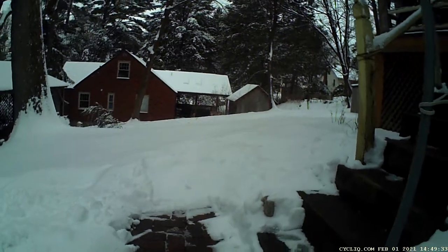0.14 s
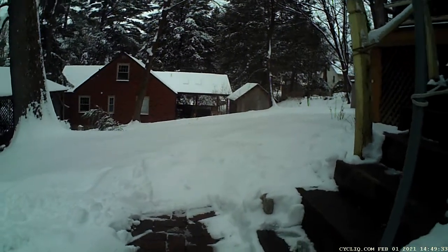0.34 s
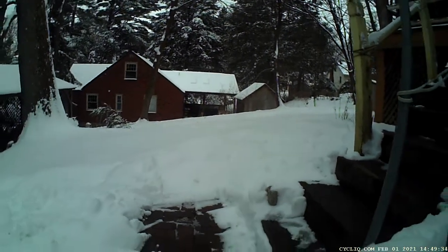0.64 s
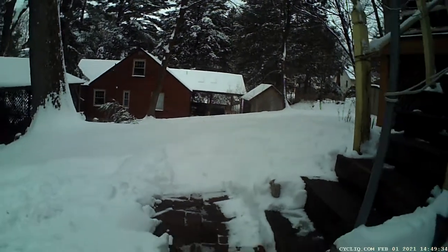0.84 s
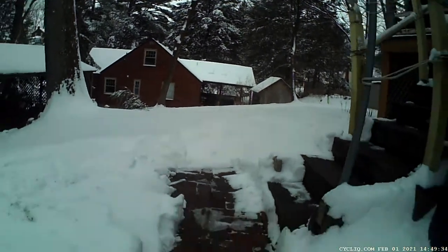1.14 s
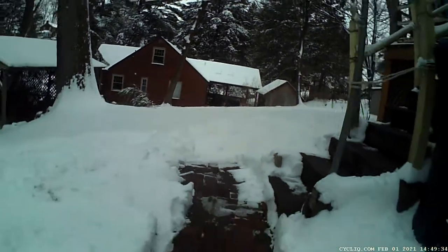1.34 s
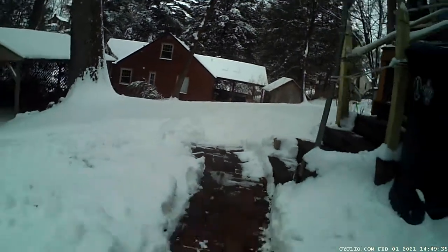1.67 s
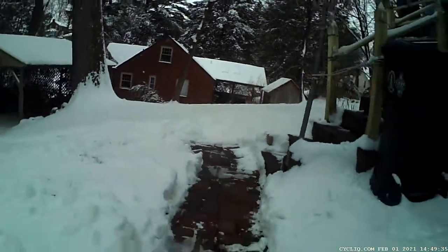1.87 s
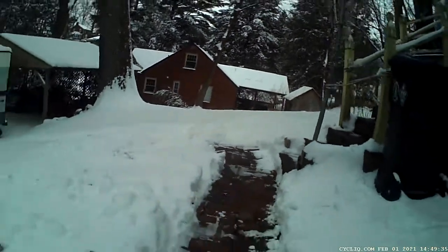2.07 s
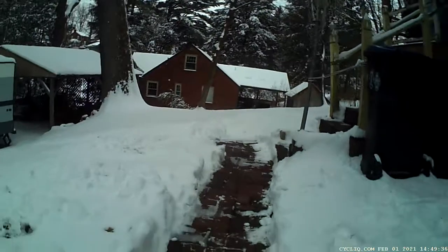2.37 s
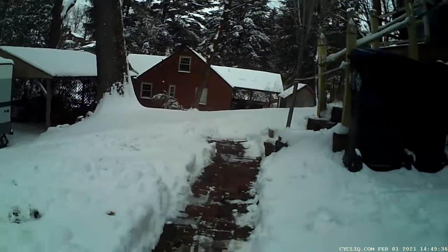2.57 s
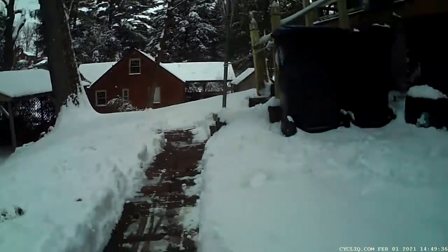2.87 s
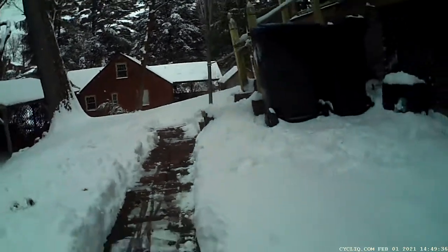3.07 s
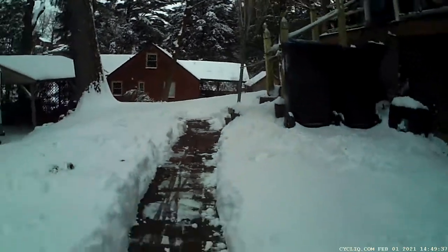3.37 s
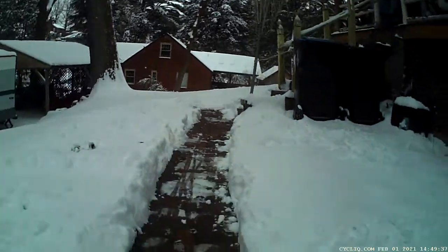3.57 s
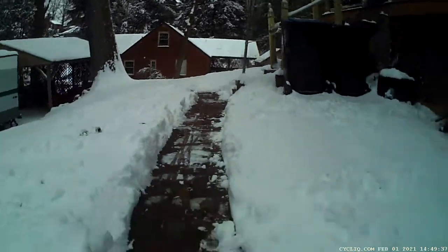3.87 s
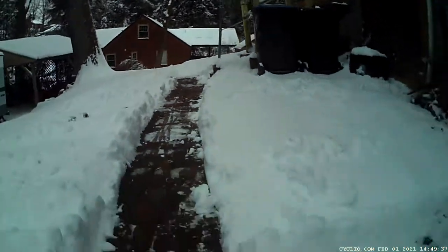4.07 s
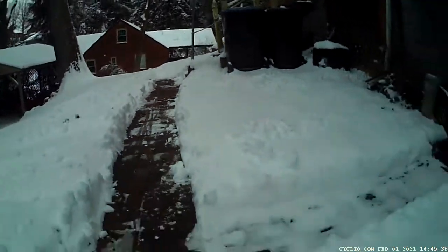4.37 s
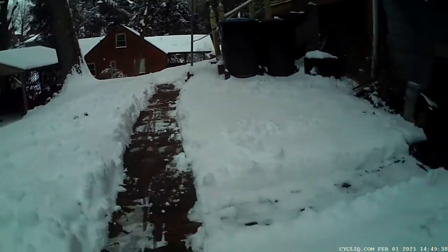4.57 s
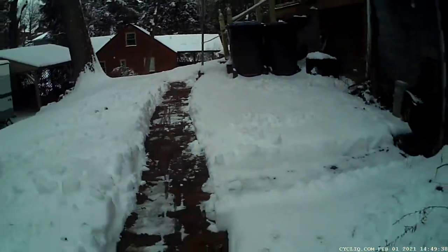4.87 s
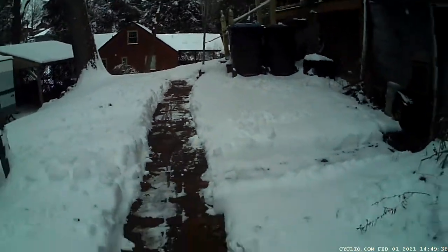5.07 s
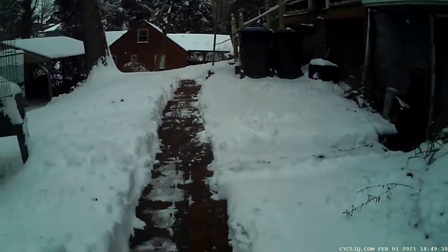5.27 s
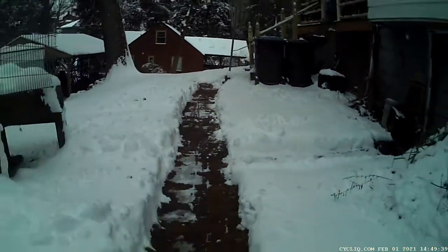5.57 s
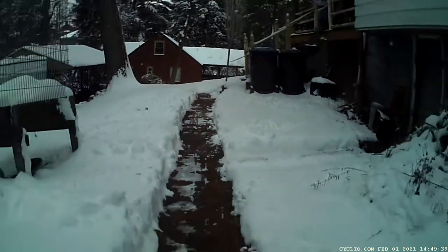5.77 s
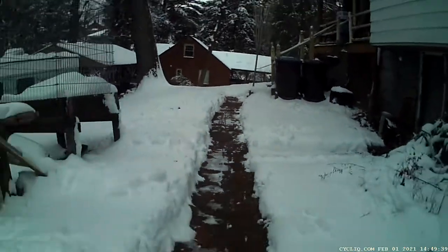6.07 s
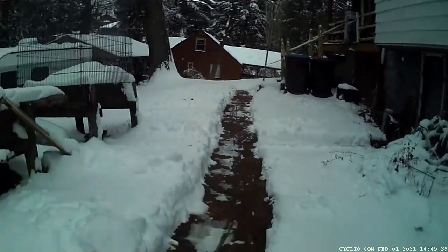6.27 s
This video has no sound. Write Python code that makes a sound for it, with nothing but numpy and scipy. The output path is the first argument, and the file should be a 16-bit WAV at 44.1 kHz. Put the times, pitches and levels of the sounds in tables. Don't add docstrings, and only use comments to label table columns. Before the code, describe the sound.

A bicycle is wheeled over an uneven brick path through snow, heard by a sealed camera microphone clamped to it, so everything is close, dry and muffled, without echo. For the first 0.9 seconds there is mostly soft steady hiss and a faint tremble, with small freewheel ticks at about 0.45 and 0.95. Just after 1 second the first jolts arrive, low thuds with a brief rattle, followed by lighter bumps until a firmer cluster around 2.0 to 2.4. Sharp taps near 2.9 lead to a heavy lurch and loud plastic clatter at 3.1 to 3.25. Irregular knocks, hollow thuds and cable slaps continue from 3.4 to 4.4. After a thinner stretch, the hardest clatter bursts at 4.9 to 5.0. Then come ticks, isolated slaps and low rumble, another rattle at 5.9, and a last bump at 6.3.

```python
import sys
import numpy as np
from scipy import signal
from scipy.fft import rfft, irfft, next_fast_len
from scipy.io import wavfile

SR = 44100
rng = np.random.default_rng(int(sys.argv[2]) if len(sys.argv) > 2 else 0)


def to_linear_factor(level_db):
    exponent = np.asarray(level_db, float) / 20
    return 10 ** exponent


def transcribe(u):
    v = np.clip(np.atleast_2d(u).T, -1, 1)
    q = np.round(v * 32767).astype(np.int16)
    wavfile.write(sys.argv[1], SR, q)


N = 282884


def unit(x):
    return x / np.sqrt(np.mean(x ** 2) + 1e-20)


def filtered(x, response):
    m = next_fast_len(N + SR // 2)
    return irfft(rfft(x, m) * response(np.fft.rfftfreq(m, 1 / SR)), m)[..., :N]


def rung(x, modes, soft_hz):
    def body(f):
        h = 0
        for k, (mode_hz, width_hz, level_db) in enumerate(modes):
            damping = 1j * f * width_hz
            h = h + (-1) ** k * to_linear_factor(level_db) * damping / (mode_hz ** 2 - f * f + damping)
        h = h / (1 + 1j * f / soft_hz) ** 2
        return h / np.sqrt(np.mean(np.abs(h) ** 2))
    return filtered(x, body)


def impulses(seconds, sizes):
    at = np.clip(np.round(np.ravel(seconds) * SR).astype(int), 0, N - 1)
    return np.bincount(at, np.ravel(sizes), N)


def grit(per_second):
    return unit((rng.random(N) < per_second / SR) * rng.standard_normal(N))


def bursts(events, cycles_up, cycles_down, sign):
    out = np.zeros(N + SR)
    for (start_s, peak_db, pitch_hz), way in zip(events, sign):
        turn = np.arange(-3 * cycles_up, 6 * cycles_down, pitch_hz / SR)
        rise, fall = np.exp(-(turn / cycles_up) ** 2), np.exp(-turn / cycles_down)
        shape = np.where(turn < 0, rise, fall)
        first = round((start_s + turn[0] / pitch_hz) * SR)
        out[first:first + len(turn)] += way * to_linear_factor(peak_db) * shape * np.cos(2 * np.pi * turn)
    return out[:N]


def random_signs(events):
    return np.sign(rng.standard_normal(len(events)))


# pitch_hz, density_db_per_hz
HISS = [(20, 9), (60, 14.5), (150, 17), (400, 13), (900, 11.5), (1500, 5.5), (3000, 3), (6000, 0),
        (14000, -1.5), (15500, -3), (17000, -23)]


def microphone_hiss():
    pitch_hz, density_db = np.transpose(HISS)
    colour = lambda f: to_linear_factor(np.interp(np.log(f + 1), np.log(pitch_hz), density_db))
    return to_linear_factor(-64) * unit(filtered(rng.standard_normal(N), colour))


# start_s, roughness_db
ROUGHNESS = [(0, -80), (.62, -77.5), (.95, -65.5), (1.5, -60), (1.8, -68.5), (2.15, -54), (2.5, -61.5),
             (2.95, -64.5), (3.25, -56.5), (3.65, -58), (4.25, -59.5), (4.7, -65), (4.97, -57.5),
             (5.2, -66.5), (5.5, -64), (5.9, -55), (6.15, -64), (6.41, -54.5)]
# pitch_hz, width_hz, level_db
FORK_MODES = [(26.1, 6.6, 1.5), (41.6, 12.6, -0.5), (57.5, 25, -9)]
FRAME_MODES = [(62.1, 13.2, 2), (99.2, 8.3, -1), (125, 17, -2.5), (177.7, 37, -8), (197.6, 47, -11),
               (320, 260, -21)]
MOUNT_MODES = [(397, 94, -4), (613, 75, 1.5), (912, 108, 0.5), (1250, 117, -1), (1420, 130, -0.5),
               (1800, 750, -7)]
SHELL_MODES = [(2120, 270, 0), (2650, 270, 1), (3180, 430, -0.5), (3760, 175, -1), (4120, 260, -5),
               (5000, 2700, -16)]
SWAY_DB, SWAY_GROWTH = -44.5, 1.2
RUMBLE_DB, RUMBLE_GROWTH = -58.5, 0.99
CHATTER_DB, CHATTER_GROWTH = -74, 0.45


def rolling():
    start_s, roughness_db = np.transpose(ROUGHNESS)
    rough_db = np.interp(np.arange(N) / SR, start_s, roughness_db)
    rough_db = rough_db - rough_db.mean()
    sway_db = np.minimum(SWAY_DB + SWAY_GROWTH * rough_db, -52)
    sway = to_linear_factor(sway_db) * unit(rung(grit(600), FORK_MODES, soft_hz=125))
    rumble_db = RUMBLE_DB + RUMBLE_GROWTH * rough_db
    rumble = to_linear_factor(rumble_db) * unit(rung(grit(220), FRAME_MODES, soft_hz=400))
    clamp = unit(rung(grit(2000), MOUNT_MODES, soft_hz=3020))
    shell = unit(rung(grit(3000), SHELL_MODES, soft_hz=6150))
    chatter_db = CHATTER_DB + CHATTER_GROWTH * rough_db
    return sway + rumble + to_linear_factor(chatter_db) * (clamp + to_linear_factor(-3) * shell)


# start_s, peak_db
PAWLS = [(.446, -49.5), (.9464, -50.5), (1.0395, -65), (1.0676, -54), (1.1537, -62), (1.1758, -58),
         (1.3426, -50), (1.9476, -60), (2.4498, -58), (2.5344, -55), (2.5789, -61), (2.9896, -57),
         (3.2361, -57), (3.856, -53), (4.1302, -58), (4.4326, -57), (4.5478, -54.5), (4.6654, -54),
         (4.7434, -55.5), (5.2617, -54), (5.612, -52), (5.689, -52), (5.737, -61), (5.754, -55),
         (5.8106, -53), (5.866, -60), (5.9618, -55), (5.9762, -53), (6.245, -56), (6.259, -55)]
# start_s, peak_db, pitch_hz
TAPS = [(0.497, -57, 2730), (.71, -57, 3640), (1.0878, -47, 3660), (1.2263, -55, 3700), (2.0656, -46, 2450),
        (2.2589, -59, 4070), (2.3297, -57, 2220), (2.3772, -51.5, 2650), (2.837, -55, 2800),
        (2.881, -51, 2710), (2.9279, -54, 3465), (3.1304, -54, 2580), (3.161, -52, 3570),
        (3.386, -51, 2770), (3.3951, -53, 3700), (3.6097, -57, 2400), (3.7383, -54, 2220),
        (3.8394, -51, 2220), (3.9372, -56, 1850), (4.212, -47, 3550), (4.398, -48, 3560),
        (4.896, -52, 1700), (4.9132, -43, 2350), (4.9272, -42, 2220), (4.9938, -55, 2470),
        (5.1195, -50, 3800), (5.3977, -49, 3580), (5.787, -53, 2400), (5.9097, -47, 2390),
        (5.93, -52, 3340)]
PAWL_HZ, PAWL_SCATTER_HZ = 3100, 90
GRAINS, GRAIN_DB, GRAIN_SCATTER_DB, GRAIN_LOW_HZ, GRAIN_SPAN_HZ = 40, -68.5, 1.8, 2200, 1720


def small_parts():
    start_s, peak_db = np.transpose(PAWLS)
    pawl_hz = PAWL_HZ + PAWL_SCATTER_HZ * rng.standard_normal(len(start_s))
    pawls = np.transpose([start_s, peak_db, pawl_hz])
    u = rng.random((GRAINS, 3))
    grain_s = 1 + (N / SR - 1.1) * u[:, 0]
    grain_db = GRAIN_DB - GRAIN_SCATTER_DB * np.log(1 - u[:, 1])
    grain_hz = GRAIN_LOW_HZ + GRAIN_SPAN_HZ * u[:, 2]
    return np.vstack([pawls, TAPS, np.transpose([grain_s, grain_db, grain_hz])])


def ticks():
    parts = small_parts()
    way = random_signs(parts)
    start_s, peak_db, _ = parts.T
    ping = bursts(parts, cycles_up=0.35, cycles_down=3.3, sign=way)
    click = rung(impulses(start_s, way * to_linear_factor(peak_db + 7.5)), SHELL_MODES, soft_hz=12000)
    return to_linear_factor(0.5) * ping + click


# start_s, peak_db, pitch_hz
LURCHES = [(.76, -51, 59.6), (.942, -43.5, 55), (1.075, -43, 48), (1.164, -40.5, 44), (1.45, -38.5, 36),
           (1.536, -42, 39), (1.95, -38.5, 37.2), (2.222, -39.5, 43), (2.375, -37.5, 42), (2.46, -44, 48),
           (2.579, -50, 50), (2.765, -36, 37.3), (3.057, -38, 35.5), (3.136, -32, 51.7), (3.165, -27.5, 44),
           (3.472, -50, 36), (3.57, -42, 40), (3.798, -39, 38), (3.98, -36, 38), (4.232, -43, 40),
           (4.55, -36.5, 40.5), (4.901, -31, 44), (4.93, -30, 47), (5.025, -41, 44), (5.133, -42, 41.5),
           (5.266, -39.5, 40), (5.6, -43.5, 40), (5.836, -44, 44), (6.161, -60, 34), (6.337, -50, 46)]
# start_s, peak_db, pitch_hz
EDGES = [(1.056, -38, 91), (1.093, -34, 77.4), (1.385, -50, 70.6), (1.681, -42.5, 89), (1.772, -39.5, 96),
         (2.055, -31.5, 105), (2.117, -37.5, 95), (2.204, -51, 83), (2.256, -37, 94), (2.585, -39.5, 101),
         (2.741, -37, 90), (3.053, -41.5, 84), (3.454, -36.5, 121), (3.493, -33, 106), (3.561, -39.5, 93),
         (3.715, -39, 106), (3.799, -48, 121.7), (3.821, -35, 116), (3.841, -30, 107), (3.972, -40, 63.4),
         (4.161, -40, 77), (4.188, -39, 118), (4.232, -39, 125), (4.53, -43, 78), (4.902, -33, 114),
         (5.257, -43.5, 116), (5.741, -39, 117), (5.83, -43, 87), (6.245, -38, 105), (6.32, -38, 100)]
# start_s, peak_db, pitch_hz, flight_s
HOPS = [(1.472, -36, 91, 0.052), (1.713, -38.5, 104, .029), (1.975, -36.5, 101, 0.039),
        (2.136, -37, 110, 0.054), (2.398, -33, 81, 0.052), (3.136, -31.5, 99, .052),
        (3.219, -33.5, 112, 0.023), (3.274, -42, 124, 0.048), (3.581, -38.5, 99, 0.028),
        (3.744, -35, 97, 0.045), (4.046, -39.5, 92, .058), (4.214, -33.5, 142, 0.046),
        (4.774, -35, 90, 0.036), (4.929, -31, 134, 0.027), (4.997, -41.5, 93, 0.027),
        (5.924, -36.5, 112, 0.017)]
# start_s, peak_db, pitch_hz
REBOUNDS = [(1.085, -42, 80), (1.397, -40, 90), (2.059, -34.5, 120), (3.048, -41, 80), (3.126, -30, 80),
            (3.223, -38, 100), (3.496, -35, 120), (3.514, -35, 120), (3.739, -40, 110), (3.826, -37, 120),
            (4.25, -39, 100), (4.89, -36, 100), (4.969, -39, 80), (4.992, -36.5, 100), (5.928, -37.5, 125),
            (5.956, -36, 100), (6.323, -41, 110)]
LANDING_LOSS_DB, LANDING_PITCH_RATIO = 3, 0.93


def jolts():
    takeoffs = [row[:-1] for row in HOPS]
    landings = [(start_s + flight_s, peak_db - LANDING_LOSS_DB, pitch_hz * LANDING_PITCH_RATIO)
                for start_s, peak_db, pitch_hz, flight_s in HOPS]
    shoves = EDGES + takeoffs + landings
    push = bursts(shoves, cycles_up=0.47, cycles_down=0.52, sign=-np.ones(len(shoves)))
    lurch = bursts(LURCHES, cycles_up=0.47, cycles_down=0.68, sign=-np.ones(len(LURCHES)))
    rebound = bursts(REBOUNDS, cycles_up=0.3, cycles_down=0.31, sign=np.ones(len(REBOUNDS)))
    start_s, peak_db, _ = np.transpose(shoves)
    ring = rung(impulses(start_s, to_linear_factor(peak_db + 6)), FRAME_MODES, soft_hz=500)
    return to_linear_factor(0.5) * push + lurch + rebound + ring


# start_s, length_s, level_db, brightness_db, loss_db_per_bounce
RATTLES = [(1.083, .005, -46.5, -15.5, 1), (1.458, .015, -49.5, -13, 5), (1.733, .015, -49.5, -17, 0),
           (1.966, .015, -49, -9, 3), (2.05, .015, -39, -15, 0.5), (2.129, .015, -45.5, -17.5, -1),
           (2.249, .015, -48.5, -11.5, 7), (2.38, .015, -53, -4.5, 2), (4.226, .025, -43, -13.5, 8),
           (3.135, .025, -40, -10.5, -2.5), (3.214, .035, -40, -17.5, 6.5), (3.488, .035, -44, -14.5, 3),
           (3.6, .015, -54, -16.5, -1), (3.712, .025, -43, -15.5, 6), (3.818, .025, -43.5, -16, .6),
           (4.193, .025, -41, -12.5, 9), (4.758, .025, -54.5, -12, -1.5), (4.91, .015, -36.5, -12, -1),
           (4.983, .015, -47.5, -13, 1), (5.256, .025, -53, -7.5, 2), (5.909, .015, -45, -12, -4),
           (5.945, .025, -48.5, -13.5, 0.5), (6.234, .025, -51, -8, -1.5), (6.313, .025, -45, -13.5, 1)]
BOUNCE_S, BOUNCE_SCATTER_S, BOUNCE_SCATTER_DB, DULLING_DB = .0108, .0012, 2.5, 0.5


def bounces():
    start_s, length_s, level_db, bright_db, loss_db = np.transpose(RATTLES)[:, :, None]
    k = np.arange(7)
    luck = rng.standard_normal((len(start_s), 2, len(k))) * (k > 0)
    bounce_s = start_s + k * BOUNCE_S + BOUNCE_SCATTER_S * luck[:, 1]
    bounce_db = level_db - loss_db * k + BOUNCE_SCATTER_DB * luck[:, 0]
    bounce_db = bounce_db - 120 * (k * BOUNCE_S > length_s)
    rows = np.array([bounce_s, bounce_db, bright_db - DULLING_DB * k])
    return rows.reshape(len(rows), -1).T


def chatter(start_s, level_db, fade_s, count):
    u = rng.random((len(start_s), 2, count))
    lag_s = -fade_s * np.log(1 - u[:, 0]) * (np.arange(count) > 0)
    size = np.cos(2 * np.pi * u[:, 1]) * np.exp(-lag_s / (3 * fade_s))
    size[:, 0] = 1.02 * np.sign(size[:, 0])
    size = size / np.linalg.norm(size, axis=1, keepdims=True)
    return impulses(start_s + lag_s, to_linear_factor(level_db) * size)


# start_s, level_db, brightness_db
KNOCKS = [(1.37, -54, -12), (1.631, -53, -11.5), (1.703, -50, -11.5), (1.102, -48, -7.5), (2.687, -52, -9),
          (2.226, -52, -7), (2.431, -48.5, -9.5), (2.583, -56, -10), (2.746, -49, -27.5), (2.784, -52, -10),
          (2.885, -60, 3), (3.161, -43.5, -11.5), (3.183, -46, -11.5), (3.391, -41.5, -4.5),
          (3.416, -43, -14.5), (3.437, -45.5, -13), (3.774, -57, -6), (3.798, -45.5, -19.5),
          (3.934, -58, 3.5), (4.035, -46, -12), (4.078, -54, -8.5), (4.159, -47.5, -9), (4.394, -53, -3.5),
          (4.546, -60, -1.5), (4.884, -54, -14), (4.958, -45, -16), (5.121, -54, -4.5), (4.182, -51, -11.5),
          (5.379, -58, 1.5), (5.732, -51.5, -2),
          (3.129, -41, -6.5), (3.408, -46, -13), (6.3, -51, -5.5), (2.9, -50, -10), (4.9, -41.5, -6.5),
         (4.901, -39, -11.5), (4.927, -46, -4), (6.2, -51, -9), (3.168, -48, -10.5), (3.119, -48.5, -8.5),
         (2.6, -48, -4.5), (2.9, -55, -2), (1.5, -52, -9), (3.397, -46, -1.5)]
# start_s, peak_db, pitch_hz
POPS = [(1.093, -50, 270), (1.104, -59, 600), (2.135, -46, 250), (5.1195, -50, 6500), (3.1402, -49, 7000),
        (4.9275, -46, 6500), (4.9045, -52, 7000), (3.9355, -52, 6000), (4.212, -53, 5500),
        (4.189, -38, 190), (3.121, -45, 400), (3.1645, -35, 200), (3.245, -38, 400), (3.529, -43, 523),
        (3.61, -39, 447), (3.848, -40, 400), (4.78, -45.5, 600), (4.888, -44, 320), (4.929, -36, 170),
        (5.006, -41, 437), (5.278, -39.5, 726), (6.319, -57, 300)]
# pitch_hz, width_hz, level_db
BAR_MODES = [(195, 38, -1.5), (300, 170, -16)]


def knocks():
    start_s, level_db, bright_db = np.vstack([KNOCKS, bounces()]).T[:, :, None]
    fade_s = .004 * to_linear_factor(-.4 * bright_db)
    start_s = start_s + 0.00258 * np.clip(1 + bright_db / 5, 0, 1)
    clamp = rung(chatter(start_s, level_db + 15, fade_s, count=12), MOUNT_MODES, soft_hz=3440)
    shell_db = level_db + bright_db + 17
    shell = rung(chatter(start_s, shell_db, fade_s, count=9), SHELL_MODES, soft_hz=7000)
    bar_db = level_db + 16 - 0.66 * np.maximum(bright_db + 10.5, 0)
    bar = rung(chatter(start_s, bar_db, fade_s, count=4), BAR_MODES, soft_hz=600)
    pops = bursts(POPS, cycles_up=0.15, cycles_down=0.41, sign=-np.ones(len(POPS)))
    return clamp + shell + bar + pops


# start_s, peak_db
SNAPS = [
    (1.0867, -55),
    (2.8506, -47),
    (2.8792, -46),
    (3.388, -47),
    (3.935, -43.5),
    (4.3936, -43),
    (4.8507, -48),
    (5.1191, -45),
    (5.809, -50),
    (5.8657, -47.5),
]
# pitch_hz, width_hz, level_db
TUBE_MODES = [(1790, 280, 1.5), (2650, 100, 1.5), (3700, 140, 2.5), (4630, 370, -6), (7000, 1600, -14.5)]


def snaps():
    start_s, peak_db = np.transpose(SNAPS)
    return rung(impulses(start_s, to_linear_factor(peak_db + 11)), TUBE_MODES, soft_hz=14000)


# start_s, peak_db, pitch_hz
SHELL_CLACKS = [(1.088, -52, 3630), (2.0528, -48, 2060), (2.0578, -53, 3290), (2.1471, -51, 2340),
                (2.3307, -59, 3920), (2.8515, -53, 2690), (2.8515, -55, 3740), (2.9902, -49, 2950),
                (3.1249, -63, 4810), (3.1314, -47, 2530), (3.1379, -46, 2170), (3.1404, -49, 3930),
                (3.1424, -44, 1910), (3.1473, -49, 2340), (3.1508, -46, 2050), (3.1563, -51, 2180),
                (3.1643, -54, 1910), (3.1643, -52, 3640), (3.2451, -51, 2130), (3.2461, -59, 3970),
                (3.3918, -44, 2720), (3.3963, -40, 2220), (3.4033, -47, 2470), (3.4167, -54, 2450),
                (3.4202, -53, 2980), (3.5195, -56, 2250), (3.6103, -50, 4040), (3.8203, -54, 2010),
                (3.8398, -51, 2200), (3.9366, -46, 3650), (3.9376, -51, 2560), (3.9894, -62, 4170),
                (4.0393, -53, 1960), (4.199, -51, 1710), (4.2124, -49, 2050), (4.8974, -42, 2260),
                (4.9019, -48, 2270), (4.9034, -46, 4110), (4.9049, -48, 2350), (4.9123, -43, 1730),
                (4.9208, -41, 2220), (4.9228, -39, 3350), (4.9273, -45, 2980), (5.1199, -48, 3710),
                (5.7873, -52, 3530), (5.8667, -50, 3220), (5.9006, -57, 4030), (5.9101, -48, 2330),
                (5.928, -53, 2020), (6.3281, -53, 1840)]
# start_s, peak_db, pitch_hz
BAR_THUDS = [(1.091, -48, 257), (1.3594, -52, 240), (1.4727, -53, 310), (1.7116, -47.5, 232),
             (2.1391, -46.5, 230), (2.1486, -52, 380), (2.2579, -55.5, 228), (2.5796, -54, 460),
             (3.1399, -35, 220), (3.1648, -38, 230), (3.2376, -46, 300), (3.3105, -55, 240),
             (3.4472, -46, 243), (3.526, -50, 229), (3.5285, -50, 450), (3.6093, -49.5, 280),
             (3.7205, -49, 200), (3.7485, -50, 221), (3.8009, -47, 260), (3.8403, -45, 280),
             (3.8478, -56, 460), (4.191, -46, 230), (4.2154, -39, 202), (4.2349, -44, 230),
             (4.2444, -54, 420), (4.4394, -52, 250), (4.7642, -54, 290), (4.9044, -39, 241),
             (4.9293, -36, 200), (4.9547, -51, 220), (5.0011, -49, 200), (5.0051, -47, 380),
             (5.0286, -52, 201), (5.291, -56, 430), (6.2578, -53, 440), (6.3221, -51, 200)]
# start_s, peak_db, pitch_hz
CLAMP_CLACKS = [(1.1037, -51, 1170), (1.4582, -51, 1070), (1.7151, -51, 1240), (1.9825, -48, 990),
                (2.0518, -45.5, 1150), (2.0638, -43, 1230), (2.131, -48, 1080), (2.1408, -50, 930),
                (3.1234, -51, 1280), (3.1324, -46, 1130), (3.1405, -43, 955), (3.1495, -35, 1140),
                (3.163, -50, 1160), (3.1628, -47, 650), (3.2164, -43, 1160), (3.2287, -48, 880),
                (3.2446, -49, 610), (3.2506, -55, 580), (3.3931, -44, 1280), (3.4045, -51, 1160),
                (3.4117, -49, 940), (3.4177, -47, 640), (3.4182, -47, 1140), (3.4416, -49, 1130),
                (3.49, -54, 1170), (3.4906, -48, 640), (3.5, -50, 1090), (3.6106, -54, 1430),
                (3.6103, -51, 620), (3.7127, -44.5, 1140), (3.7954, -53, 1140), (3.8009, -49, 1040),
                (3.8049, -52.5, 880), (3.8193, -48, 1110), (3.8303, -49, 970), (3.8378, -46, 710),
                (3.8478, -52, 680), (4.184, -49, 1300), (4.195, -47, 1020), (4.199, -47, 950),
                (4.2106, -49, 1070), (4.2284, -49, 1160), (4.2364, -52, 1090), (4.898, -42, 1120),
                (4.9034, -44, 1440), (4.9078, -40, 1320), (4.9115, -41, 940), (4.9123, -42, 1650),
                (4.9208, -35.5, 1120), (4.935, -50, 1030), (4.9433, -50, 1290), (4.9612, -52, 1040),
                (5.006, -46, 590), (5.9111, -43.5, 1090), (5.921, -44, 960), (5.95, -48, 1040),
                (5.96, -50, 1480), (6.3161, -47, 1160), (6.3211, -52, 930), (6.3276, -48, 960)]


def clacks():
    clamp = bursts(CLAMP_CLACKS, cycles_up=0.8, cycles_down=2.6, sign=random_signs(CLAMP_CLACKS))
    shell = bursts(SHELL_CLACKS, cycles_up=0.88, cycles_down=4.4, sign=random_signs(SHELL_CLACKS))
    bar = bursts(BAR_THUDS, cycles_up=0.8, cycles_down=1.36, sign=random_signs(BAR_THUDS))
    return to_linear_factor(-1) * (clamp + shell) + to_linear_factor(-0.5) * bar


BUZZ_DB, BUZZ_T60_S, BUZZ_TOP_DB, CRACK_DB = -17.5, 0.037, -5.5, -2.5


def buzz():
    start_s, peak_db, _ = np.transpose(CLAMP_CLACKS)
    t = np.arange(SR // 10) / SR
    decay = to_linear_factor(-60 * t / BUZZ_T60_S)
    shake = signal.fftconvolve(impulses(start_s - .002, to_linear_factor(peak_db)), decay)[:N]
    low = unit(rung(grit(2500), MOUNT_MODES, soft_hz=4000))
    top = unit(rung(grit(2500), SHELL_MODES, soft_hz=10900))
    crack = impulses(start_s - .0008, to_linear_factor(peak_db + CRACK_DB))
    edge = rung(crack, [(2500, 4500, 0)], soft_hz=7000)
    return to_linear_factor(BUZZ_DB) * shake * (low + to_linear_factor(BUZZ_TOP_DB) * top) + edge


def scene():
    return (rolling() + ticks() + jolts() + knocks() + snaps() + clacks() + buzz())[None]


def roll_off(x):
    return signal.sosfilt(signal.butter(12, 15660, fs=SR, output="sos"), x)


def record(dry):
    offset = .0085
    return roll_off(dry + microphone_hiss() + offset)


dry = scene()
out = record(dry)
transcribe(out)
```